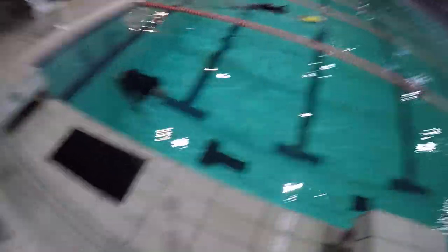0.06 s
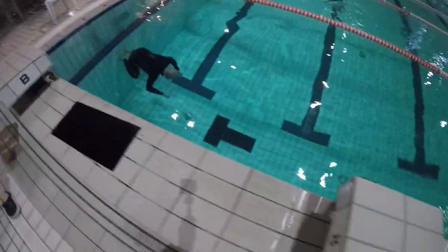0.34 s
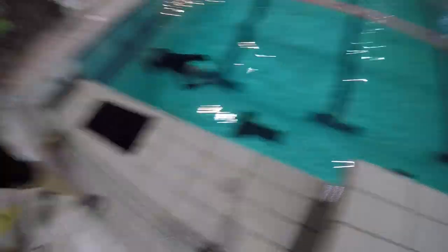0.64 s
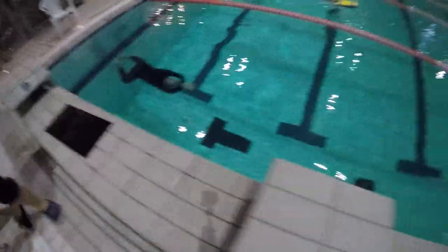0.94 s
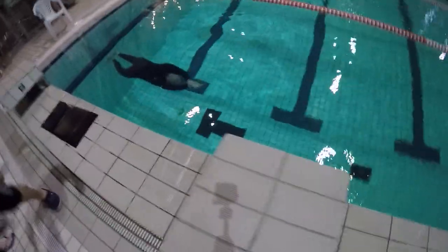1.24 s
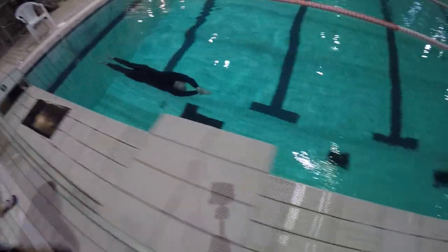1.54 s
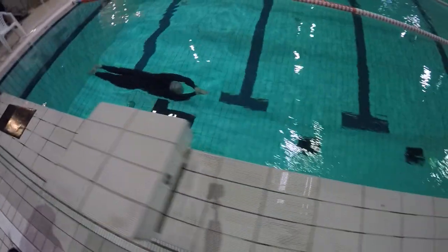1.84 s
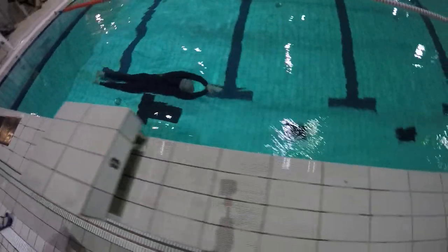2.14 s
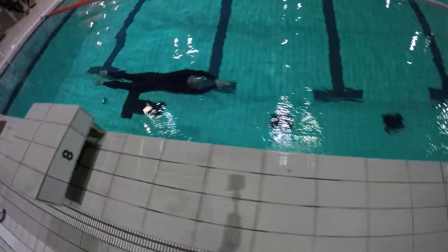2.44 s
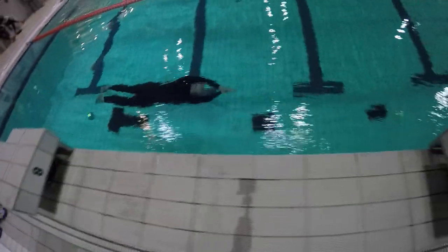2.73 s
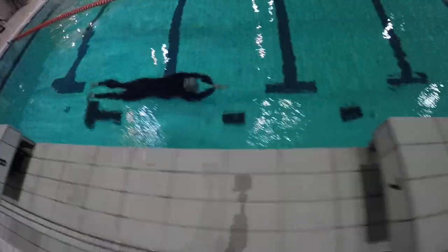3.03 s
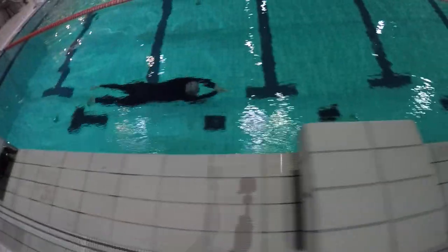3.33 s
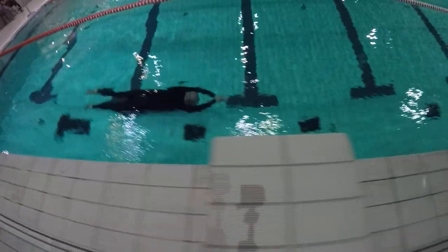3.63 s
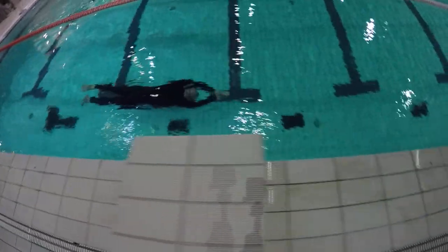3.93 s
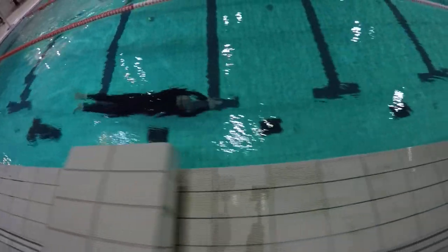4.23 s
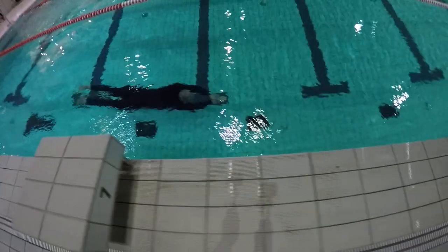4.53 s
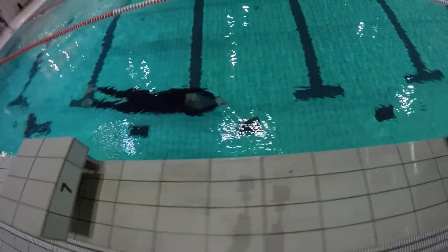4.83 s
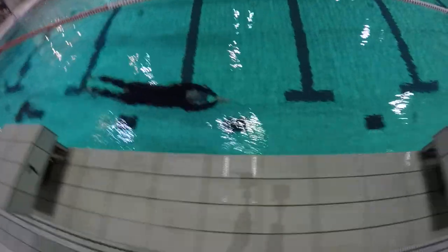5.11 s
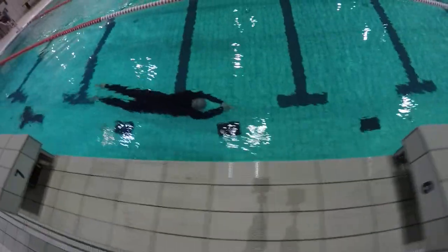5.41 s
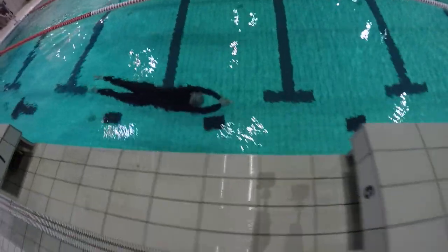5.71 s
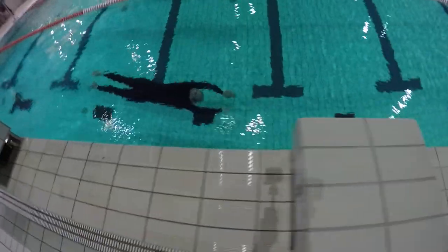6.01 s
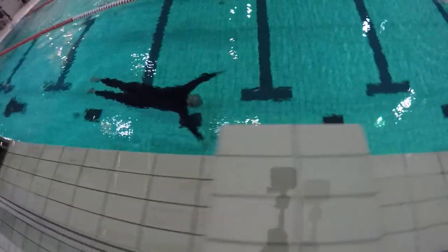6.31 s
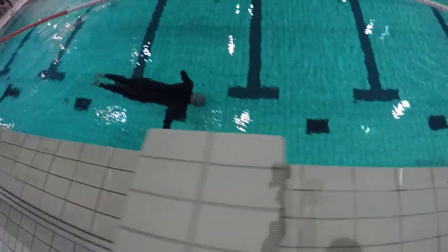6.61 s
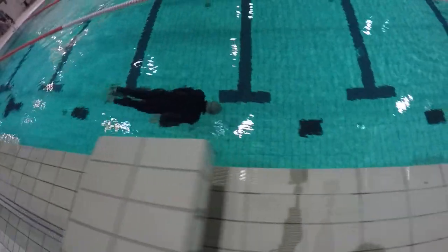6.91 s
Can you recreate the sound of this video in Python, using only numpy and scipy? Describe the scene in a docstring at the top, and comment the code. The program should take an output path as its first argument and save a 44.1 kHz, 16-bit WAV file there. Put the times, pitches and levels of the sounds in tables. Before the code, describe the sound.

Water spills steadily into the overflow gutter of an indoor swimming pool, blurred by the tiled hall into an even hiss. In the first second a hand rubs and bumps the microphone's mount, with low booms and a dry plastic knock. After a softer bump, the water continues over a low rumble from the carrier's steps. A few faint drips follow, then one small, sharp click close by.

```python
"""An indoor swimming pool, heard from a camera carried along the edge.
Water spills steadily into the overflow gutter and the tiled hall smears it into a hiss, coloured by
the camera's case. Early on a hand rubs, brushes and bumps the camera mount; afterwards only the low
rumble of each step, a few drips and one small click stand out."""
import sys
import numpy as np
from scipy import signal
from scipy.fft import rfft, irfft, next_fast_len
from scipy.io import wavfile
from scipy.ndimage import map_coordinates

SR = 44100
rng = np.random.default_rng(int(sys.argv[2]) if len(sys.argv) > 2 else 0)


def log_audio(samples):
    """Write samples as a 16-bit WAV file to the path given in sys.argv[1]."""
    # one column per channel
    frames = np.atleast_2d(samples).T
    # limit to full scale, then quantise
    limited = np.clip(frames, -1, 1)
    pcm = np.round(limited * 32767).astype(np.int16)
    wavfile.write(sys.argv[1], SR, pcm)


N = 306936


def amp(db):
    """Decibels to gain."""
    return 10 ** (np.asarray(db) / 20)


def unit(x):
    """Scaled to rms 1."""
    return x / np.sqrt(np.mean(x ** 2) + 1e-20)


def along(points, hz):
    """Read a curve of (f/Hz, value) points on a log frequency axis."""
    f, v = np.transpose(points)
    return np.interp(np.log(hz + 1), np.log(f + 1), v)


def wobble(rate_hz):
    """A smooth random modulator with rate_hz knots a second."""
    knots = rng.standard_normal(int(N * rate_hz / SR) + 4)
    return map_coordinates(knots, [np.arange(N) * rate_hz / SR])


def filtered(x, response):
    """Zero-phase EQ; response gives the gain at each frequency."""
    size = next_fast_len(N + SR // 2)
    return irfft(rfft(x, size) * response(np.fft.rfftfreq(size, 1 / SR)), size)[:N]


def band_noise(count, centre_hz, width_hz):
    """A bell-shaped band of noise at rms 1."""
    hz = np.fft.rfftfreq(count, 1 / SR)
    bell = np.exp(-((hz - centre_hz) / width_hz) ** 2)
    return unit(irfft(rfft(rng.standard_normal(count)) * bell, count))


def add(track, s, sound):
    """Mix a sound in at s seconds."""
    part = track[max(round(s * SR), 0):][:len(sound)]
    part += sound[:len(part)]


def bubbles(count, low_hz, high_hz, decay_cycles, spread_db=2.0):
    """Bubbles ring briefly at random times, rising in pitch, a few much louder than the rest."""
    when, pitch, size = rng.random((3, count, 1))
    t = np.arange(SR // 80) / SR
    hz = low_hz + (high_hz - low_hz) * pitch
    age = hz * t / decay_cycles
    gain = amp(-spread_db * np.log(size + 0.042)) * np.sqrt(hz)
    chirp = 1 + 0.021 * np.minimum(age, 2)
    rings = gain * np.exp(-age) * np.sin(2 * np.pi * hz * t * chirp)
    index = (when * N).astype(int) + np.arange(len(t))
    return unit(np.bincount(index.ravel(), rings.ravel(), N)[:N])


def hall(x):
    """The tiled hall's long reverb, fully wet and shorter in the treble."""
    # reverb time: f/Hz, t60/s
    decay = [(200, 1.6), (2000, 2.14), (10000, 0.18)]
    hz, t, noise = signal.stft(rng.standard_normal(SR), SR, nperseg=256)
    fade = amp(-60 * t / along(decay, hz)[:, None])
    tail = signal.istft(noise * fade, SR, nperseg=256)[1]
    return unit(irfft(rfft(x) * rfft(tail, N), N))


def water_colour(hz):
    """The water's broad spectrum with the camera case's resonances on top."""
    # wash of running water: f/Hz, relative level/dB
    wash_eq = [(40, 7.5), (170, 1), (400, 0), (700, -3.5), (1150, -3.5), (1600, 0.5), (3000, 0.57),
               (3750, 1.5), (4100, -8.5), (4700, -12), (6100, -15.5), (8700, -22), (11000, -27),
               (15000, -33)]
    # case resonances: f/Hz, width/Hz, lift/dB
    case_peaks = [(1348, 110, 3.5), (1623, 95, 1.5), (2044, 62, 4.5), (2436, 143, 4.5), (3300, 254, 6.5),
                  (3890, 100, 3.5), (4310, 120, 3), (5000, 160, 3), (5440, 170, 5), (6840, 300, 4.5)]
    lift = sum(db * np.exp(-((hz - centre) / width) ** 2) for centre, width, db in case_peaks)
    return amp(along(wash_eq, hz) + lift)


def gutter(crossover_hz=4400, wash_db=-49.5, spray_db=-63.5):
    """Near bubbles ride on the smeared rush of the overflow; fine spray comes and goes above it."""
    # how hard the water spills: t/s, relative level/dB
    flow = [(1.1, -64), (1.54, -65.5), (1.78, -64), (2.05, -62.5), (2.57, -63.5), (3.46, -63),
            (3.93, -64.5), (4.22, -63), (6.33, -65), (6.9, -64)]
    flow_db = np.interp(np.arange(N) / SR, *np.transpose(flow))
    surge_db = flow_db - flow_db.mean()
    near = bubbles(count=8000, low_hz=702, high_hz=8880, decay_cycles=4.1)
    far = hall(bubbles(count=3000, low_hz=303, high_hz=7030, decay_cycles=10.9))
    water = rng.standard_normal(N) + amp(-10 + 0.46 * wobble(7)) * near + amp(-10.5) * far
    lowpass = lambda hz: 1 / (1 + (hz / crossover_hz) ** 10)
    wash = unit(filtered(water, lambda hz: water_colour(hz) * lowpass(hz)))
    spray = unit(filtered(water, lambda hz: water_colour(hz) * (1 - lowpass(hz))))
    wash *= amp(wash_db + 0.49 * surge_db + 0.077 * wobble(11))
    spray *= amp(spray_db + 1.5 * surge_db + 0.76 * wobble(20))
    return wash + spray


def carrying_rumble(steady_db=-41.5, step_db=-39):
    """The carried camera rumbles: a deep swell with each step, and more until the hand settles."""
    # carrying rumble: f/Hz, relative level/dB
    rumble_eq = [(8, -4.5), (20, -2), (32, 4), (45, -10.5), (62, -9.5), (82, -13.5), (100, -20),
                 (135, -31.5), (200, -39), (400, -48), (1000, -110)]
    first_step_s, stride_s, step_width_s, step_top_hz = 0.49, 0.66, 0.078, 42
    tremble_db, tremble_until_s, settle_s = 8, 1.054, 0.11
    t = np.arange(N) / SR
    from_step = (t - first_step_s + stride_s / 2) % stride_s - stride_s / 2
    swell = np.exp(-(from_step / step_width_s) ** 2)
    tremble = np.clip(1 - (t - tremble_until_s) / settle_s, 0, 1)
    steady_gain = amp(steady_db + tremble_db * tremble + 1.1 * wobble(7.4))
    colour = lambda hz: amp(along(rumble_eq, hz))
    steady = unit(filtered(rng.standard_normal(N), colour))
    deep = unit(filtered(rng.standard_normal(N), lambda hz: colour(hz) / (1 + (hz / step_top_hz) ** 4)))
    return steady_gain * steady + amp(step_db) * swell * deep


def microphone_hiss():
    """An even, faint hiss under the spray."""
    return amp(-72) * rng.standard_normal(N)


def rubbing(press_db_per_s=26, attack_s=0.0094, release_t60_s=0.17):
    """A hand slides on the mount in many tiny slips, which also shake it."""
    # strokes that press ever harder, then let go: start/s, end/s, relative end level/dB
    strokes = [(0.028, 0.16, -45), (0.284, 0.515, -48.5), (0.524, 0.737, -40), (0.677, 0.708, -44),
               (0.902, 1.028, -49.5)]
    # scuff of the rubbed mount: f/Hz, relative level/dB
    scuff_eq = [(60, -9), (200, 2), (310, -5.5), (420, -1.5), (550, -10.5), (750, -1.5), (1050, 1),
                (1300, -0.5), (1850, 4.5), (2200, -4.5), (2600, 4), (3000, -13), (4300, -12.5), (5200, -40),
                (12000, -51)]
    t, grip = np.arange(N) / SR, np.zeros(N)
    for start, end, db in strokes:
        fade_db = press_db_per_s * np.maximum(end - t, 0) + 60 * np.maximum(t - end, 0) / release_t60_s
        grip += np.clip((t - start) / attack_s, 0, 1) * amp(db - fade_db)
    slips = rng.standard_normal(N) * amp(1.1 * wobble(350))
    scuff = unit(filtered(slips, lambda hz: amp(along(scuff_eq, hz))))
    shudder = unit(filtered(slips, lambda hz: np.exp(-((hz - 78) / 40) ** 2)))
    return grip * (scuff + amp(4.5) * shudder)


def brushing(attack_s=0.00042):
    """Fingers brush the mount with a dull, quickly fading rustle."""
    # soft touches: t/s, relative level/dB, t60/s
    touches = [(.038, -39.5, 0.099), (.107, -33.5, 0.13), (.692, -37, 0.11), (1.63, -39.5, 0.028),
               (1.647, -39, 0.076), (1.674, -42, .04)]
    # finger rustle: f/Hz, relative level/dB
    rustle_eq = [(40, 5.5), (140, 2), (230, -7), (420, -3), (600, -16), (1000, -13), (1900, -12.5),
                 (2600, -20), (5000, -28.5), (12000, -55)]
    pressure, t = np.zeros(N), np.arange(SR // 4) / SR
    for s, db, t60 in touches:
        add(pressure, s, amp(db - 60 * t / t60) * (1 - np.exp(-t / attack_s)))
    rustle = unit(filtered(rng.standard_normal(N), lambda hz: amp(along(rustle_eq, hz))))
    return amp(3) * pressure * rustle


def bumps(attack_s=0.0097):
    """Bumps flex the mount with a low boom."""
    # booms of the mount: t/s, level/dB, f/Hz, t60/s
    booms = [(0.042, -23, 73, .11), (.112, -9, 82.6, 0.072), (0.541, -9.5, 45, 0.15),
             (0.591, -19.5, 76, 0.32), (0.699, -2, 80.4, 0.17), (.765, -13, 40.8, 0.11),
             (0.872, 0, 57.3, 0.097), (1.647, -21, 49, 0.18), (1.675, -23, 100, 0.069)]
    out, t = np.zeros(N), np.arange(SR // 2) / SR
    attack = 1 - np.exp(-(t / attack_s) ** 2)
    for s, db, hz, t60 in booms:
        add(out, s, amp(db - 60 * t / t60) * attack * np.sin(2 * np.pi * hz * t))
    return out


def knocks(attack_s=0.00029, crack_t60_s=0.01):
    """Hard contacts in the mount give a dry plastic knock: a crack and a short ring."""
    # hard contacts: t/s, relative level/dB
    contacts = [(.8732, -10.5), (.876, -21.5), (1.63, -32), (1.675, -35)]
    # modes of the mount: f/Hz, relative level/dB, t60/s
    modes = [(259, -13, 0.029), (411, 2.5, 0.025), (716, -19, 0.025), (930, -3.5, 0.026), (1280, -16, .012),
             (1680, -8.5, 0.019), (2320, -18, 0.012), (2800, -15, 0.013)]
    out, t = np.zeros(N), np.arange(SR // 2) / SR
    attack = 1 - np.exp(-(t / attack_s) ** 2)  # the plastic gives a little, which dulls the edge
    for s, db in contacts:
        ring = np.zeros(len(t))
        for k, (hz, mode_db, t60) in enumerate(modes):
            envelope = amp(mode_db + rng.normal(0, 1) - 60 * t / t60)
            ring += (-1) ** k * envelope * np.sin(2 * np.pi * hz * t)
        crack = amp(-16 - 60 * t / crack_t60_s) * band_noise(len(t), centre_hz=3000, width_hz=3800)
        add(out, s, amp(db - 9) * attack * (ring + crack))
    return out


def drips(attack_s=0.00045, t60_s=0.047):
    """Each drip lands on water or tile with a brief, bright spatter."""
    # the nearest drips: t/s, level/dB, centre f/Hz
    spatters = [(2.41, -56, 5400), (2.617, -57, 5600), (3.085, -52, 5000), (3.371, -50, 6100),
                (3.529, -56, 5370)]
    out, t = np.zeros(N), np.arange(SR // 4) / SR
    attack = 1 - np.exp(-t / attack_s)
    for s, db, hz in spatters:
        add(out, s, amp(db - 60 * t / t60_s) * attack * band_noise(len(t), hz, width_hz=1500))
    return out


def click(at_s, db, hz, t60_s, attack_s=0.00018):
    """One small hard click close by, ringing for a few cycles."""
    out, t = np.zeros(N), np.arange(SR // 20) / SR
    attack = 1 - np.exp(-t / attack_s)
    add(out, at_s, amp(db - 60 * t / t60_s) * attack * np.sin(2 * np.pi * hz * t))
    return out


def scene():
    """A mono mix: water all around, handling noise up close."""
    handling = carrying_rumble() + rubbing() + brushing() + bumps() + knocks()
    water = gutter() + drips()
    small_click = click(at_s=5.0305, db=-24.5, hz=3020, t60_s=0.005)
    return (water + handling + small_click + microphone_hiss())[None]


def record(dry):
    """The camera keeps nothing above its band limit."""
    top_hz = 15300
    return np.array([filtered(channel, lambda hz: hz < top_hz) for channel in dry])


dry = scene()
out = record(dry)
log_audio(out)
```